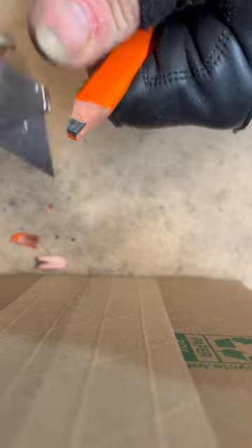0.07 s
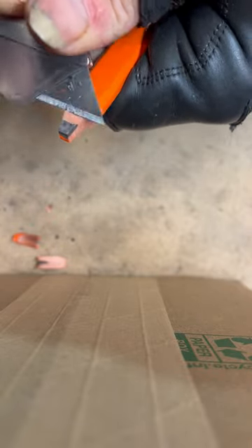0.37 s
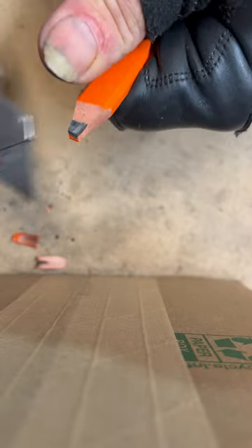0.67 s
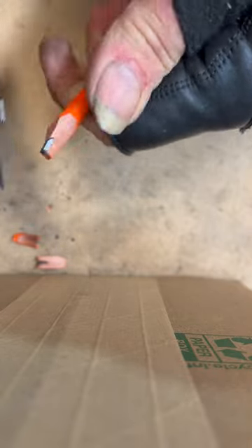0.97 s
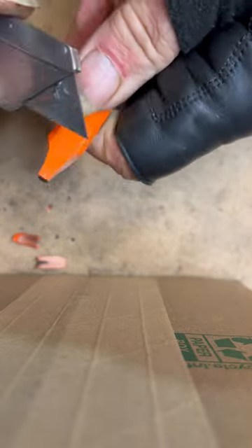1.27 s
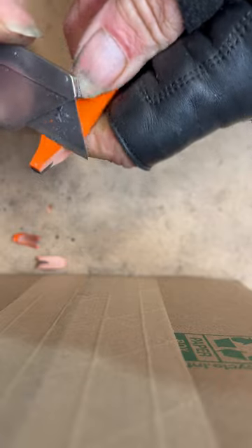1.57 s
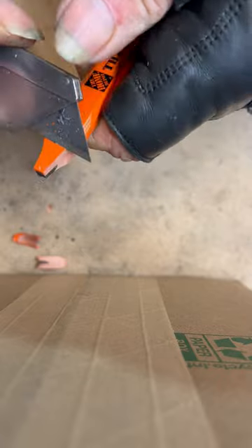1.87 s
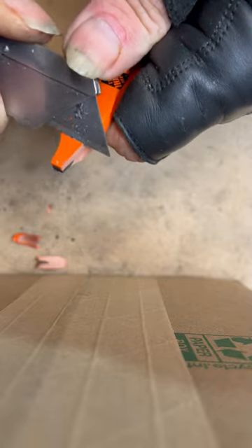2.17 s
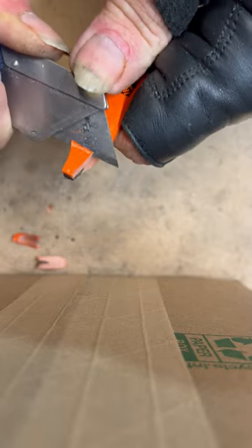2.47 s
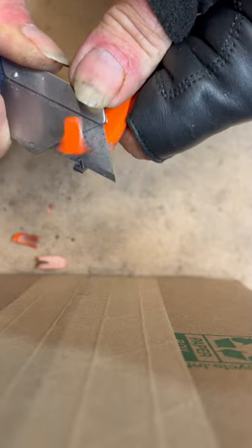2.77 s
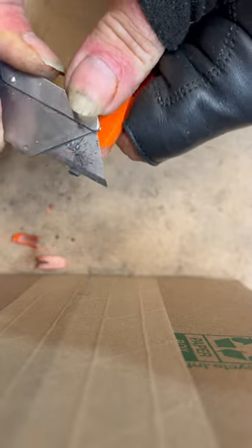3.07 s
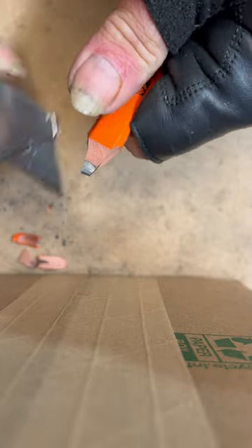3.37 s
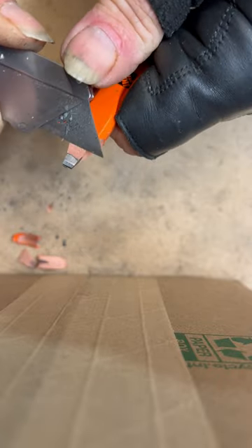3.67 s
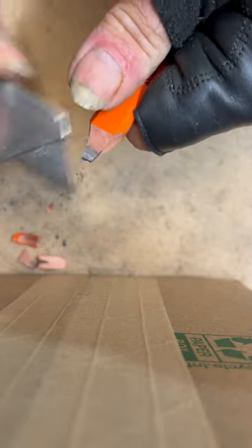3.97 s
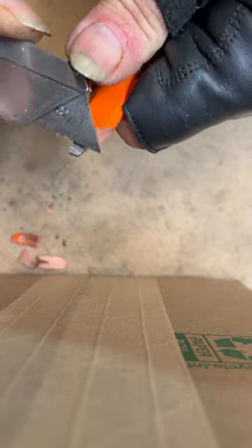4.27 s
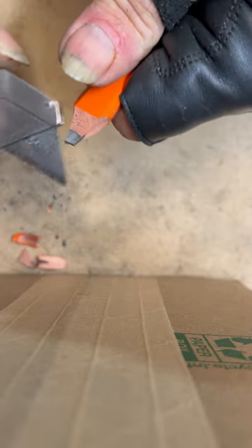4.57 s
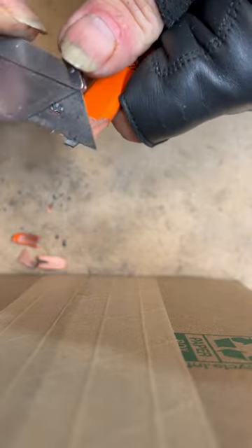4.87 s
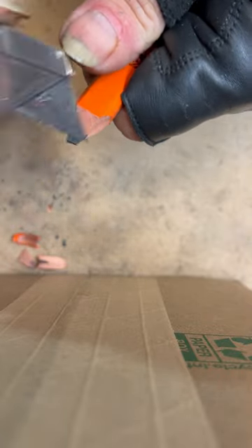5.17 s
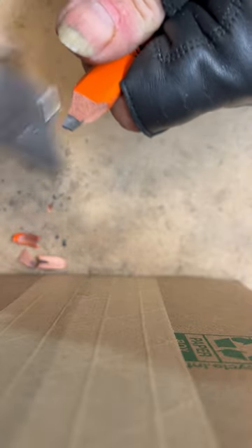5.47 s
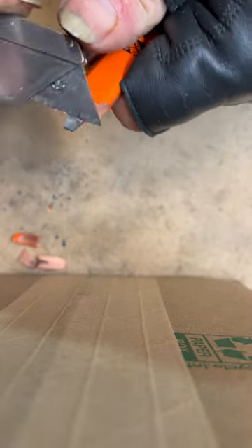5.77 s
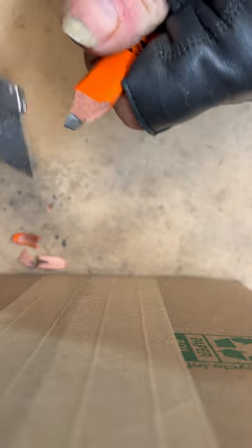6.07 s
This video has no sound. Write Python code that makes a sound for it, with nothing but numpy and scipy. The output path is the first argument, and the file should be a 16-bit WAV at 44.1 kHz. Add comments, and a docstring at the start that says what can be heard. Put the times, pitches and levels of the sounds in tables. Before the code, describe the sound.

A utility knife sharpens a flat wooden pencil close to the microphone in a quiet room. Light ticks and one quick scrape over the graphite come at about 0.5 seconds. After a brief lull, the blade bites into the wood from 1.5 seconds, with small clicks and short, gritty, splintering cuts. The cracks are loudest between 2.6 and 3.2 seconds, as chips snap off with dull little thumps in the hands. Another scrape and cut ends in a sharp snap just before 4 seconds. Then four quick, raspy strokes run over the wood and graphite, at about 4.4, 5, 5.4 and 6 seconds, each flicking off the point with a tiny tick. Between cuts, a leather glove rustles softly and a faint high hiss comes and goes. A low building rumble stays underneath, with very little echo.

```python
"""A utility knife sharpens a flat wooden pencil, close up, in a quiet room with a concrete floor.
The blade digs into the wood, which splits in bursts of tiny fractures and jolts the hands as it gives;
quick strokes scrape down over the graphite and flick off the point. The resonances of pencil and blade
colour these contacts. Between cuts the grip shifts, a leather glove rustles and a faint hiss drifts."""
import sys
import numpy as np
from scipy import signal
from scipy.fft import rfft, irfft, next_fast_len
from scipy.io import wavfile
from scipy.ndimage import map_coordinates

SR = 44100
rng = np.random.default_rng(int(sys.argv[2]) if len(sys.argv) > 2 else 0)


def output_pcm(signal):
    """Save a mono or channel-first signal as 16-bit PCM at the path in sys.argv[1].

    Samples are clipped to [-1, 1] before scaling.
    """
    pcm = np.clip(np.atleast_2d(signal).T, -1, 1) * 32767
    wavfile.write(sys.argv[1], SR, np.round(pcm).astype(np.int16))


N = 274302

# Cue levels are before the layer trims. An edge_db is relative to its own crack, scrape or splinter.
# A faint high hiss, and the glove as the grip shifts: time_s, hiss_db, glove_db
HISS_AND_GLOVE = [(0, -64, -64.5), (0.28, -80.5, -70), (0.42, -57.5, -58), (0.62, -64, -58.5),
                  (0.75, -74, -62), (0.85, -62, -63), (1.1, -59, -60.5), (1.22, -67, -64.5),
                  (1.8, -69, -63.5), (2.45, -70, -65), (2.56, -62.5, -64.5), (2.85, -70.5, -67),
                  (3.2, -68.5, -61), (3.6, -78.5, -66.5), (4.06, -73.5, -67), (5.28, -68.5, -68),
                  (5.6, -76, -62), (5.95, -77, -59.5), (6.22, -66, -69.5)]
# Low rumble of the hands: time_s, level_db
HANDLING = [(0, -66), (1.45, -68), (1.89, -62.5), (3.55, -68.5), (5.18, -64.5), (5.75, -57), (6.22, -59.5)]
# The blade creeps through wood: start_s, length_s, scrape_db, splinter_db, edge_db, bright_db_per_octave
CUTS = [(0.002, 0.03136, -56.5, -53.5, -13, -3.5), (0.36, 0.11367, -58.5, -73, -18, -0.5),
        (0.607, 0.02871, -51.5, -56.5, -17.5, 0.5), (1.672, 0.05113, -55.5, -55, -7, 0.5),
        (2.283, 0.0060086, -43, -53.5, -13, 0), (2.329, 0.05515, -59.5, -60, -1.5, 5.5),
        (2.464, 0.05173, -58, -53.5, -7.5, 0), (2.598, .042, -49.5, -51, 0.5, -0.5),
        (2.669, 0.07244, -54.5, -46, -5, -1), (3.8161, .109, -58, -44, -15, -3),
        (6.161, 0.04888, -57.5, -53.5, -13.5, -3)]
# The wood cracks, or the blade lands or catches: time_s, decay_s, crack_db, edge_db, bright_db_per_octave
SNAPS = [(0.0374, 0.000891, -51, -16, -2), (0.3092, 0.00037, -53, -28.5, -6.5),
         (0.3201, 0.0004662, -50.5, -32.5, -10), (0.458, 0.000767, -48, -9, 1.5),
         (0.5849, 0.001412, -42, -28, -3), (0.598, 0.001602, -38, -14.5, -2),
         (0.7626, 0.0002545, -55, -13.5, -2), (0.8681, 0.000527, -51.5, -27.5, -6),
         (1.224, 0.001162, -52, -22.5, -10), (1.515, 0.000751, -45.5, -26, -2),
         (1.5193, 0.001053, -39, -15, 1), (1.689, 0.000343, -38.5, -3.5, 11),
         (1.713, 0.000413, -32.5, -6.5, 2.5), (1.7193, 0.000992, -39.5, -0.5, -1),
         (2.0226, 0.000601, -67, 12, 13), (2.0653, 0.000559, -57.5, 5.5, 6.5),
         (2.2132, 0.0007064, -41.5, -1, -4.5), (2.2284, 0.001155, -48.5, -5.5, -1),
         (2.2937, 0.0004313, -36.5, -7, 2), (2.3055, 0.001811, -39, -6.5, -1),
         (2.3426, 0.000883, -47.5, 1, 7.5), (2.5692, 0.001241, -33.5, -4, -2.5),
         (2.661, .0006, -41, -0.5, 7), (2.6653, 0.001246, -33.5, 2.5, -1), (2.685, .0011, -40, -1.5, 6),
         (2.6985, 0.00333, -35, -13.5, -2), (2.7042, 0.00218, -21, -3.5, 3.5),
         (2.72, .001, -29, -12.5, -1.5), (2.733, 0.0013, -34.5, -8, 1.5), (2.898, 0.000837, -42, -9.5, 0),
         (2.916, 0.000944, -28.5, -9, -1), (2.9392, 0.000629, -21, -3.5, 1),
         (3.0254, 0.00095, -36.5, -17, 3), (3.1046, 0.0012, -41.5, -26, -7),
         (3.1097, 0.0002869, -20.5, -11.5, 0.5), (3.112, 0.0005146, -28.5, -6, 0),
         (3.1189, 0.0013, -27, -15, -6), (3.1625, 0.00055, -46, -6.5, -5),
         (3.1794, 0.000372, -49.5, 2, 4.5), (3.68, 0.002325, -48.5, -10.5, -7),
         (3.7288, 0.0010438, -45.5, -25, 1), (3.856, 0.00083, -41.5, -15, -3.5),
         (3.9028, 0.000617, -28, -10.5, 8), (3.9092, 0.000812, -32.5, -25, -5),
         (3.9343, 0.000277, -31, -8.5, 3), (3.9381, 0.001239, -18.5, -12, 1),
         (3.941, 0.0010507, -23.5, -11.5, 2.5), (4.162, 0.0006236, -50, -3, 2.5),
         (4.3394, 0.000389, -43.5, -9.5, 1.5), (4.3433, 0.0004088, -35, -12, -2),
         (4.4197, .0012, -40, -14, 4.5), (4.7899, 0.0006386, -34, -26, 4),
         (4.795, 0.0003732, -45.5, -25.5, -5.5), (5.3087, 0.000839, -52.5, -29.5, -3),
         (5.3155, 0.002215, -48.5, -31, -3), (5.4048, 0.001518, -42.5, -21, 7.5),
         (5.4519, 0.000885, -33.5, -10.5, 7), (5.7934, 0.0013, -43, -21, -7),
         (5.8678, 0.002771, -49, -21, 2), (5.968, 0.00073, -32, -7, 13),
         (6.0737, 0.0015845, -51.5, -32.5, -4), (6.129, 0.000922, -54, -27, -3),
         (6.1805, 0.001338, -42.5, -5.5, 1)]
# Quick strokes over bare wood, biting into the graphite and running off the point: bite_start_s,
# wood_s, bite_s, off_s, wood_db, bite_db, off_db, bright_db_per_octave, off_bright_db_per_octave
STROKES = [(0.516, .022, .021, 0.026, -49.5, -30.5, -39, 1, -3),
           (3.771, .042, 0.011024, .027, -48, -36.5, -42, 4, 3),
           (4.44, .021, 0.041137, 0.033875, -41, -33, -38.5, 4.5, -0.5),
           (4.956, .09, .014, .029, -44, -32, -41, 3, 11.5),
           (5.387, .017, .069, .031, -49.5, -37, -41.5, 1, 10.5),
           (5.95, .062, .019, 0.039, -39, -28.5, -45.5, 4.5, 5.5)]
# The hands jolt as the wood gives way: time_s, decay_s, level_db
JOLTS = [(2.676, 0.00646, -42.5), (2.717, 0.017, -43), (2.741, .008, -49.5), (2.922, 0.00414, -43),
         (2.944, 0.011, -43.5), (3.128, 0.01156, -48), (3.168, 0.012178, -54), (3.943, 0.005422, -47)]

# Resonances and hollows of pencil and knife, at full depth: centre_hz, width_hz, gain_db
RESONANCES = [(609.29, 120, 2), (941.2, 21, 0), (1174, 120, 5), (1598.8, 250, 12), (2109, 350, 8),
              (2633, 342.6, 4.5), (3142.2, 300, -7.5), (3362.1, 170, 7), (3750, 90, -1), (4116.8, 120, 2),
              (4275, 150, -4), (4896.6, 220, 5.5), (5375.3, 208.1, 6.5), (5786.6, 320, 5),
              (6060.8, 140, -1), (6288.4, 250, -1), (7197.4, 380, 6), (8152, 70, 1.5), (8431, 200, 4.5),
              (11503, 320, 4.5), (14700, 2800, 7)]
# Tone curve of each layer: frequency_hz, level_db
HISS_EQ = [(400, -12), (900, -12.5), (1800, 4), (3000, -11), (4100, 3), (5500, 2.5), (7800, -0.5),
           (10000, -9.5), (13000, -14.5), (16000, -28.5)]  # faint high hiss
GLOVE_EQ = [(200, -19.5), (450, 0), (800, 4), (1200, -2.5), (1900, -4), (2800, -5.5), (5000, -19),
            (8000, -30), (14000, -44.5)]  # leather rustle
HANDLING_EQ = [(50, -22), (120, 1.5), (170, 0.5), (280, -4), (450, -8), (1000, -35.5), (4000, -81)]  # muffled hand movement
RUMBLE_EQ = [(15, -22.5), (28, -11.5), (48, 0.5), (65, -0.5), (90, -2), (130, -10), (200, -20.5),
             (300, -17.5), (600, -57)]  # the building
AIR_EQ = [(25, -47.5), (120, -14), (300, 4), (500, 2), (800, -2), (1100, -0.5), (1700, -14.5), (2600, -8.5),
          (4000, -9.5), (8000, -34), (16000, -46)]  # room air
SCRAPE_EQ = [(60, -18.5), (150, -7.5), (300, -12), (680, -1.5), (900, -8.5), (1200, -4), (2300, -6.5),
             (3500, -9), (4400, -2), (5400, -0.5), (7000, -4.5), (8500, -7), (10000, -15), (13000, -36)]  # crumbling wood and graphite
EDGE_EQ = [(5000, -32.5), (8000, -6.5), (9500, 8), (11000, 5.5), (13000, -3), (15500, -4.5), (17000, -16)]  # the steel edge
CRACK_EQ = [(300, -40), (900, -4.5), (1300, -7.5), (2500, -1.5), (5200, 0.5), (8000, 0), (9500, -12),
            (13000, -25.5)]  # breaking fibres
KNOCK_EQ = [(40, -23.5), (100, -1), (180, -3.5), (330, -4.5), (560, 0), (950, -7), (1500, -11),
            (4000, -40.5), (10000, -69.5)]  # the pencil recoiling
JOLT_EQ = [(30, -21), (70, 0), (100, -1.5), (150, -4), (220, -12), (350, -22.5), (700, -40.5), (3000, -90)]  # the hands thumping
# Decay of the room's tail: frequency_hz, t60_s
ROOM_DECAY = [(100, 0.38), (500, 0.5), (2000, 0.16), (6000, 0.153), (15000, 0.052)]
# Phase by which the microphone's left port leads the right: frequency_hz, lead_rad
LEFT_LEAD = [(300, -0.13), (600, -0.53), (880, -1.0616), (1200, 1), (1500, 0.35), (4700, 0.23),
             (5400, -1.2183), (7200, -1.2393), (11700, -1.4885), (15500, -0.83)]

WOOD_EDGE_DB, GRAPHITE_EDGE_DB = -16, -13.5  # steel edge relative to a stroke's contact, before trim
WOOD_DULLER = 3.4  # dB per octave below graphite


def amp(db):
    """Decibels to gain."""
    return 10 ** (np.asarray(db) / 20)


def unit(x):
    """Scale to rms 1."""
    return x / np.sqrt(np.mean(x ** 2) + 1e-20)


def along(points, hz):
    """Read a curve of (frequency, value) points on a log frequency axis."""
    frequencies, values = np.transpose(points)
    return np.interp(np.log(hz + 1), np.log(frequencies + 1), values)


def faders(rows):
    """One value per sample for each column after the time."""
    times, *columns = np.transpose(rows)
    return [np.interp(np.arange(N) / SR, times, column) for column in columns]


def wobble(rate, size):
    """A smooth random curve, rate knots a second."""
    knots = rng.standard_normal(int(size * rate / SR) + 4)
    return map_coordinates(knots, [np.arange(size) * rate / SR])


def filtered(x, response):
    """Filter x by a complex response of frequency."""
    size = next_fast_len(N + SR // 2)
    return irfft(rfft(x, size) * response(np.fft.rfftfreq(size, 1 / SR)), size)[..., :N]


def add(track, start_s, sound):
    """Mix a sound into a track."""
    part = track[max(round(start_s * SR), 0):][:len(sound)]
    part += sound[:len(part)]


def ring(eq, depth, bright=0, vary_db=0, detune=0, size=2048):
    """One tap on pencil and knife: depth scales the resonances, vary_db and detune vary the contact."""
    hz = np.fft.rfftfreq(size, 1 / SR)
    centre, width, gain = np.transpose(RESONANCES)[:, :, None]
    gain = depth * gain + vary_db * rng.standard_normal(gain.shape)
    centre = centre * (1 + detune * rng.standard_normal(centre.shape))
    peaks_db = np.sum(gain / (1 + (2 * (hz - centre) / width) ** 2), axis=0)
    tilt_db = bright * np.log2(np.clip(hz, 1000, 8000) / 3000)
    # minimum phase, so nothing rings ahead of the tap
    cepstrum = irfft(np.log(amp(along(eq, hz) + tilt_db + peaks_db)))
    cepstrum[1:size // 2] *= 2
    cepstrum[size // 2 + 1:] = 0
    impulse = irfft(np.exp(rfft(cepstrum)))
    return impulse / np.linalg.norm(impulse)


def grains(size, rate, spread_db=2.5):
    """Tiny breaks or slips of uneven strength at random moments, rate a second."""
    happens = rng.random(size) < rate / SR
    return happens * rng.choice([-1, 1], size) * amp(spread_db * rng.standard_normal(size))


def texture(body, rate, uneven_db):
    """A soft, uneven stream of grains coloured by a body; rms 1."""
    stream = grains(N, rate) * amp(uneven_db * wobble(40, N))
    return unit(signal.fftconvolve(stream, body)[:N])


def handling(trim_db=-1):
    """A faint high hiss swells and fades; as the grip shifts, the glove rustles and the hands rumble."""
    hiss_db, glove_db = faders(HISS_AND_GLOVE)
    hands_db, = faders(HANDLING)
    hiss = amp(hiss_db) * texture(ring(HISS_EQ, depth=0.26), rate=8200, uneven_db=3.0)
    glove = amp(glove_db) * texture(ring(GLOVE_EQ, depth=0.25), rate=3200, uneven_db=1.5959)
    hands = amp(hands_db) * texture(ring(HANDLING_EQ, depth=0), rate=2000, uneven_db=3.376)
    return amp(trim_db) * (hiss + glove + hands)


def noise_bed(eq, width):
    """Stereo noise of rms 1; width is the gain of the side against the mid."""
    mid, side = filtered(rng.standard_normal((2, N)), lambda hz: amp(along(eq, hz)))
    return unit(np.array([mid + width * side, mid - width * side]))


def room_tone(rumble_db=-59, air_db=-68, waver_db=2.0):
    """A low, wavering building rumble under soft, wide room air."""
    rumble = amp(rumble_db + waver_db * wobble(36, N)) * noise_bed(RUMBLE_EQ, width=0.036)
    return rumble + amp(air_db) * noise_bed(AIR_EQ, width=1.0)


def slides(press_db=5.5, bite_swell_db=0.5, off_sag_db=1.5, trail_s=0.073, lift_db=16.5, fade_db=14):
    """Scrape cues: a stroke presses over wood, bites, runs off and brushes away; a cut holds steady."""
    cues = []  # start_s, length_s, first_db, last_db, edge_db, bright_db_per_octave
    for s, wood_s, bite_s, off_s, wood_db, bite_db, off_db, bright, off_bright in STROKES:
        trail_db = off_db - lift_db
        cues += [(s - wood_s, wood_s, wood_db - press_db, wood_db, WOOD_EDGE_DB, bright - WOOD_DULLER),
                 (s, bite_s, bite_db, bite_db + bite_swell_db, GRAPHITE_EDGE_DB, bright),
                 (s + bite_s, off_s, off_db, off_db - off_sag_db, GRAPHITE_EDGE_DB, off_bright),
                 (s + bite_s + off_s, trail_s, trail_db, trail_db - fade_db, WOOD_EDGE_DB, 0)]
    return cues + [(s, length_s, db, db, edge_db, bright) for s, length_s, db, _, edge_db, bright in CUTS]


def scrapes(edge_trim_db=-1, judder_db=2.0887, catch_db=2.2428, fade_s=0.003):
    """The edge crumbles wood and graphite into dense grit, juddering fast and catching on the grain."""
    out, steel = np.zeros(N), ring(EDGE_EQ, depth=0.78)
    t = np.arange(SR // 8) / SR  # spans the longest slide
    for start_s, length_s, first_db, last_db, edge_db, bright in slides():
        gate = np.sqrt(np.clip(np.minimum(t, length_s + fade_s - t) / fade_s, 0, 1))
        force = amp(np.interp(t, [0, length_s], [first_db, last_db])) * gate
        slip = amp(judder_db * wobble(600, len(t)) + catch_db * wobble(170, len(t)))
        tip = ring(SCRAPE_EQ, depth=0.69, bright=bright, vary_db=1.5)
        for body, level_db in (tip, 0), (steel, edge_db + edge_trim_db):
            grit = unit(slip * grains(len(t), rate=11000))
            add(out, start_s - fade_s / 2, amp(level_db) * signal.fftconvolve(force * grit, body))
    return out


def splinters(decay_s=0.0012, gap_s=0.0104, jitter_s=0.0015, scatter_db=2, bright_scatter=3, grit_db=-6.5):
    """Snap cues: on wood the blade sticks and slips at a nearly even pace, each slip a small snap."""
    runs = [(s, length_s, db, edge_db, bright) for s, length_s, _, db, edge_db, bright in CUTS]
    runs += [(s - wood_s, wood_s, wood_db + grit_db, WOOD_EDGE_DB, bright - WOOD_DULLER)
             for s, wood_s, _, _, wood_db, _, _, bright, _ in STROKES]
    cues = []
    for start_s, length_s, db, edge_db, bright in runs:
        times = np.arange(start_s, start_s + length_s, gap_s)[1:]
        for s, (late, louder, brighter) in zip(times, rng.standard_normal((32, 3))):
            colour = bright + bright_scatter * brighter
            cues.append((s + jitter_s * late, decay_s, db + scatter_db * louder, edge_db, colour))
    return cues


def avalanche(body, decay_s, rise_s, lead_s, lead_in_db=-30):
    """A faint noisy lead-in swells for lead_s, then fractures crest and die away in a body; energy 1."""
    t = np.arange(int((lead_s + 7 * decay_s) * SR)) / SR - lead_s
    swell = np.exp(-np.logaddexp(-t / rise_s, t / decay_s))
    lead_in = amp(lead_in_db) * (t < 0) * (1 + t / lead_s) ** 2
    sound = signal.fftconvolve((swell + lead_in) * grains(len(t), rate=26000), body)
    return sound / (np.linalg.norm(sound) + 1e-20)


def snaps(edge_trim_db=-1, knock_slower=4.3, knock_late_s=0.001199, lead_s=0.008):
    """Fibres break in a short avalanche, the steel ticks, and the pencil knocks back into the hand."""
    out = np.zeros(N)
    hand, steel = ring(KNOCK_EQ, depth=0.6), ring(EDGE_EQ, depth=0.8246)
    for s, decay_s, db, edge_db, bright in SNAPS + stroke_ticks() + splinters():
        start_s, rise_s = s - lead_s, 0.4542 * decay_s
        level = amp(db) * np.sqrt(0.005 * SR)  # db is the rms over 5 ms
        knock_db = -14 - 1.2906 * bright  # dull snaps knock harder
        wood = ring(CRACK_EQ, depth=1.0, bright=bright, vary_db=1.3, detune=0.0047)
        crack = avalanche(wood, decay_s, rise_s, lead_s)
        tick = amp(edge_db + edge_trim_db) * avalanche(steel, decay_s, rise_s, lead_s)
        knock = amp(knock_db) * avalanche(hand, decay_s * knock_slower, rise_s, lead_s)
        add(out, start_s, level * (crack + tick))
        add(out, start_s + knock_late_s, level * knock)
    return out


def stroke_ticks(decay_s=0.0011, catch_db=-49, flick_db=-41):
    """Snap cues: every stroke opens with a catch on the wood and ends with a flick off the point."""
    cues = []
    for s, wood_s, bite_s, off_s, _, _, _, bright, off_bright in STROKES:
        cues += [(s - wood_s, decay_s, catch_db, WOOD_EDGE_DB, bright - WOOD_DULLER),
                 (s + bite_s + off_s, decay_s, flick_db, GRAPHITE_EDGE_DB, off_bright)]
    return cues


def jolts():
    """The sudden release of force shakes both hands: a dull thump."""
    out, hands = np.zeros(N), ring(JOLT_EQ, depth=0)
    for s, decay_s, db in JOLTS:
        lead_s = 2 * decay_s
        thump = avalanche(hands, decay_s, 0.54 * decay_s, lead_s)
        add(out, s - lead_s, amp(db) * np.sqrt(lead_s * SR) * thump)
    return out


def room(x, bounce_s=0.0091, bounce_db=-24, tail_db=-19):
    """One early bounce off the floor, then a short diffuse tail."""
    hz, t, noise = signal.stft(rng.standard_normal((2, SR // 3)), SR, nperseg=256)
    decay = amp(-60 * t / along(ROOM_DECAY, hz)[:, None])
    tail = signal.istft(noise * decay, SR, nperseg=256)[1]
    diffuse = signal.fftconvolve(x[None], tail / np.linalg.norm(tail[0]), axes=1)[:, :N]
    bounce = filtered(x, lambda f: np.exp(-2j * np.pi * f * bounce_s))
    return amp(bounce_db) * bounce + amp(tail_db) * diffuse


def scene():
    """Knife and pencil up front, the room around them."""
    foley = snaps() + jolts() + scrapes() + handling()
    return foley + room(foley) + room_tone()


def record(dry, lean_left_db=0.2042, top_hz=16400):
    """The microphone's two ports hear the sound out of step; a steep low-pass closes off the top."""
    sides = np.array([[1], [-1]])
    ports = filtered(dry, lambda hz: amp(lean_left_db * sides) * np.exp(.5j * sides * along(LEFT_LEAD, hz)))
    return filtered(ports, lambda hz: 1 / (1 + (hz / top_hz) ** 120))


dry = scene()
out = record(dry)
output_pcm(out)
```